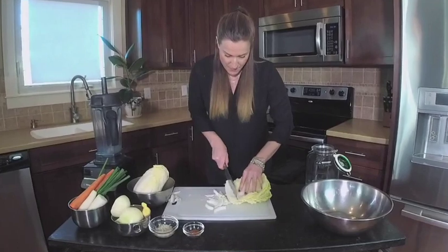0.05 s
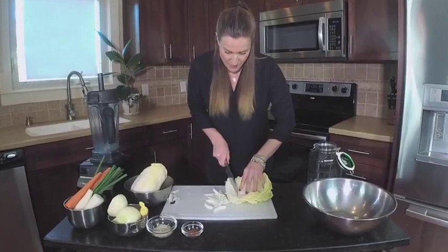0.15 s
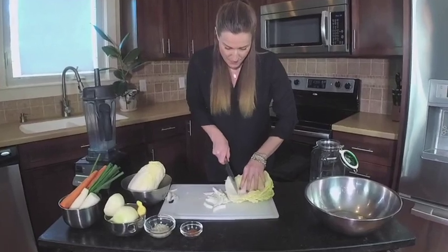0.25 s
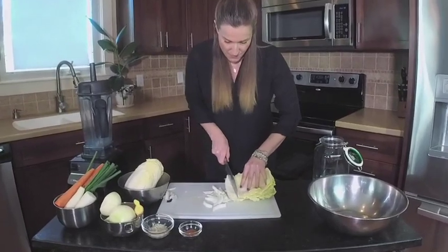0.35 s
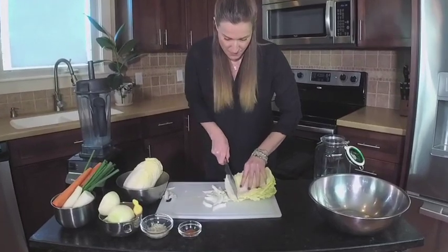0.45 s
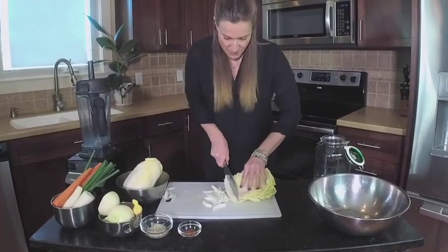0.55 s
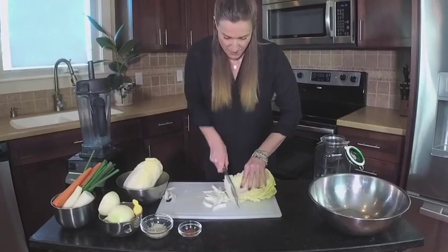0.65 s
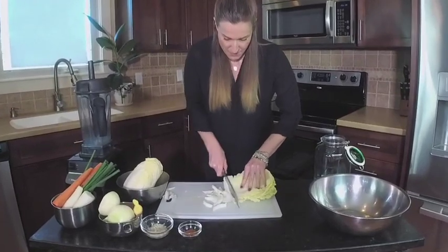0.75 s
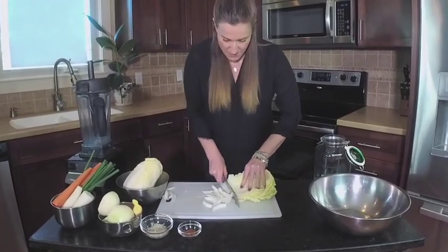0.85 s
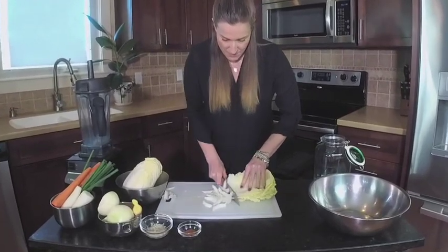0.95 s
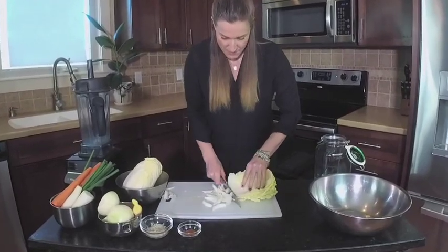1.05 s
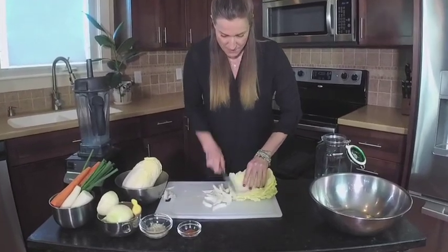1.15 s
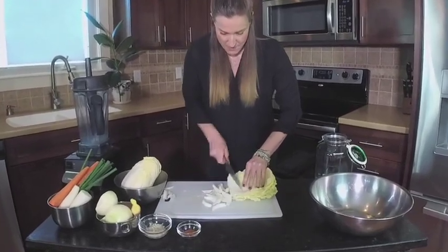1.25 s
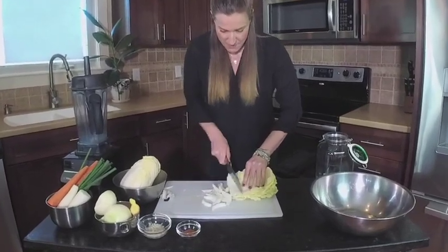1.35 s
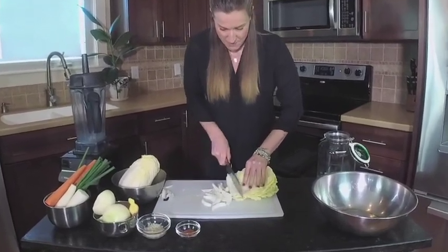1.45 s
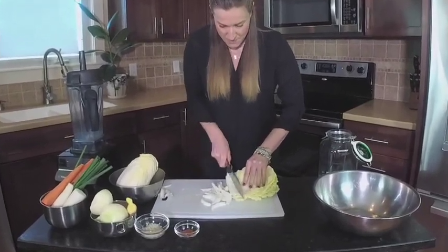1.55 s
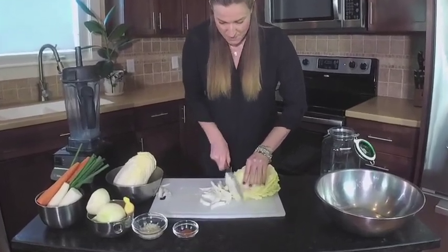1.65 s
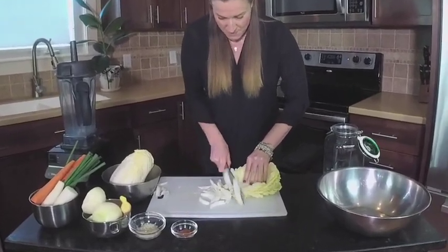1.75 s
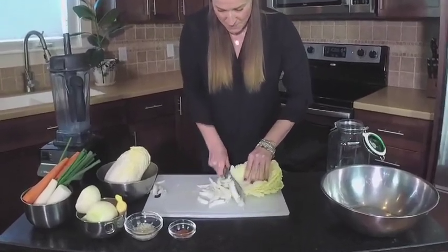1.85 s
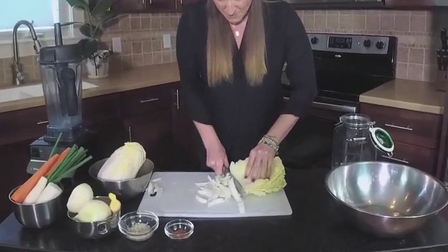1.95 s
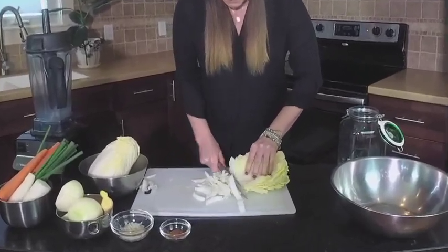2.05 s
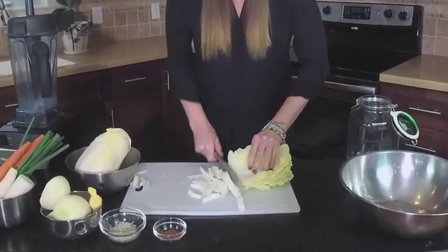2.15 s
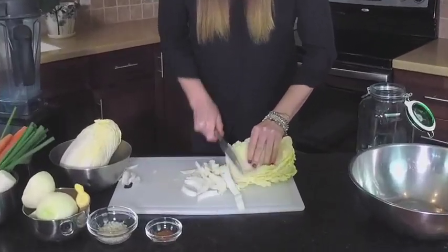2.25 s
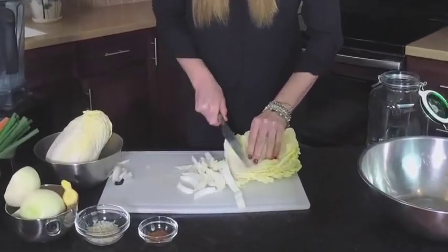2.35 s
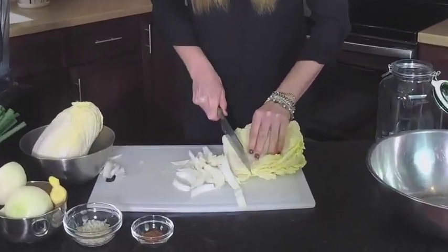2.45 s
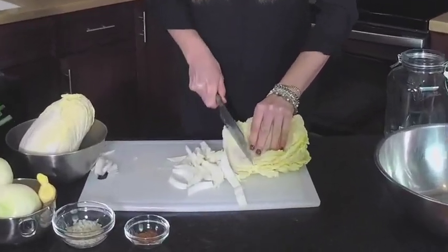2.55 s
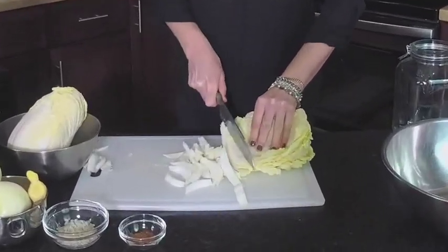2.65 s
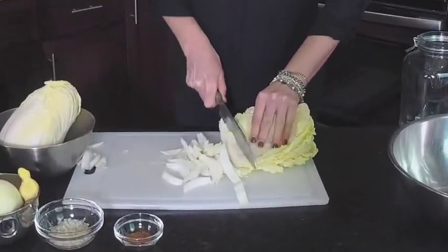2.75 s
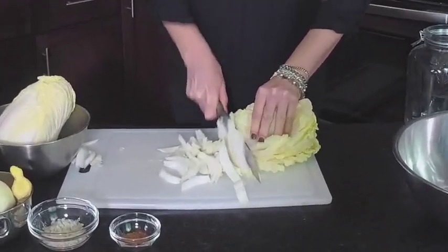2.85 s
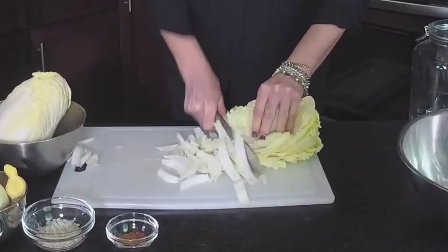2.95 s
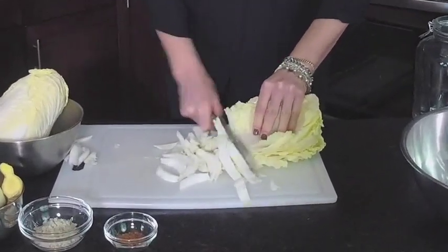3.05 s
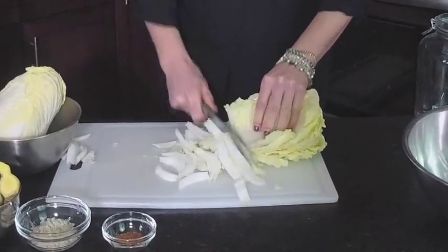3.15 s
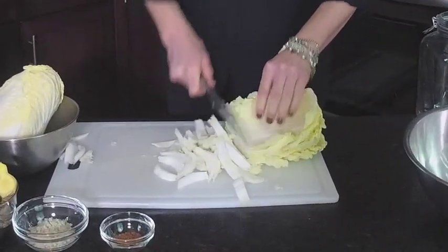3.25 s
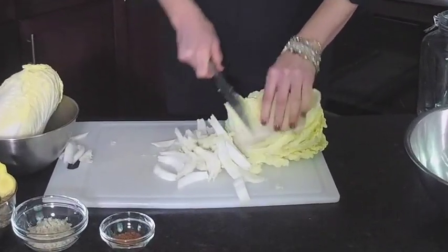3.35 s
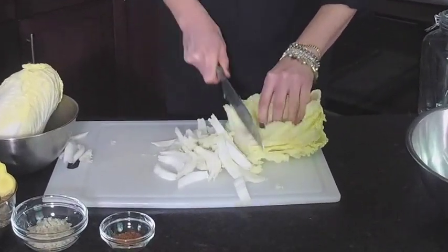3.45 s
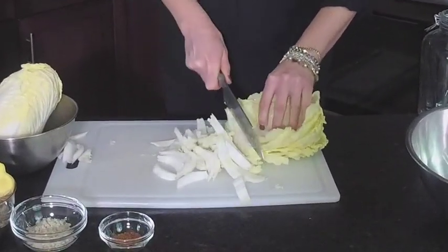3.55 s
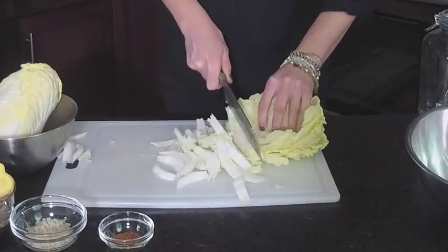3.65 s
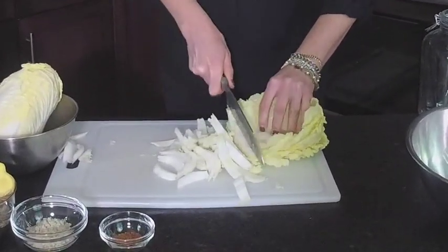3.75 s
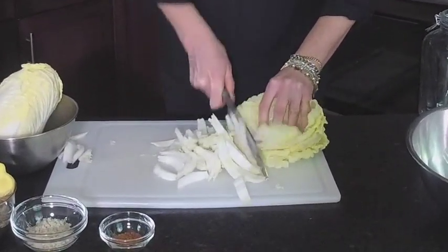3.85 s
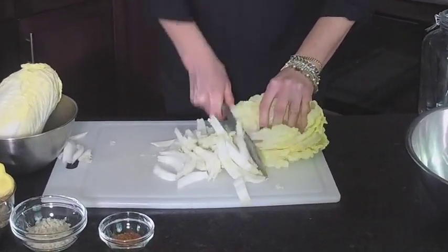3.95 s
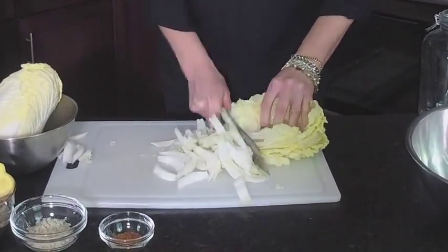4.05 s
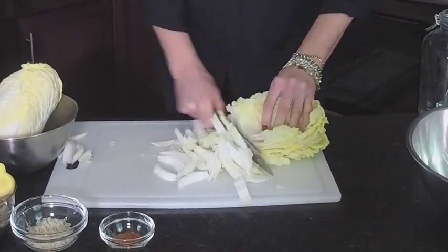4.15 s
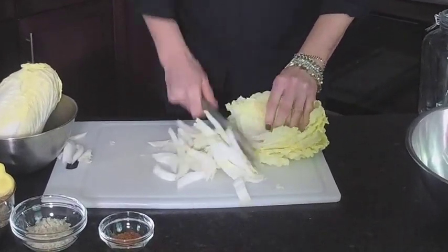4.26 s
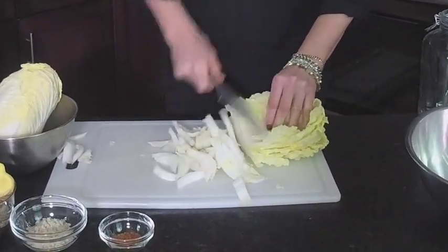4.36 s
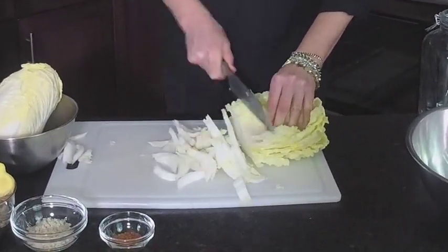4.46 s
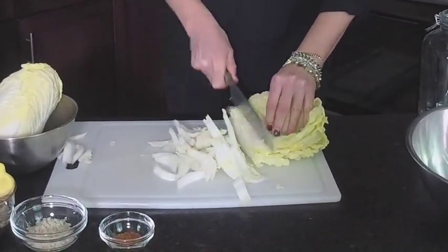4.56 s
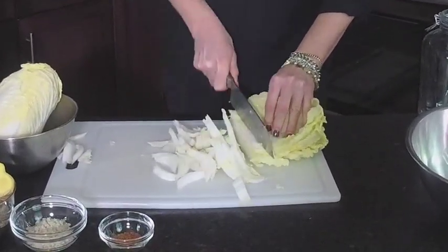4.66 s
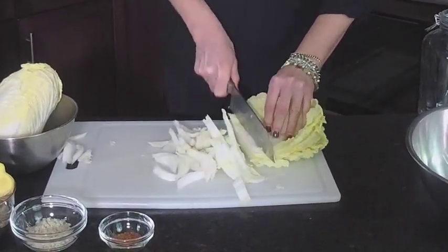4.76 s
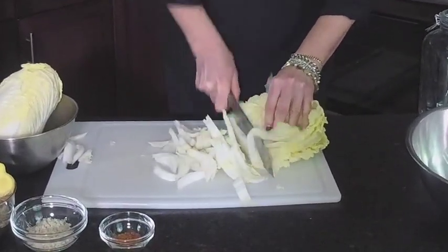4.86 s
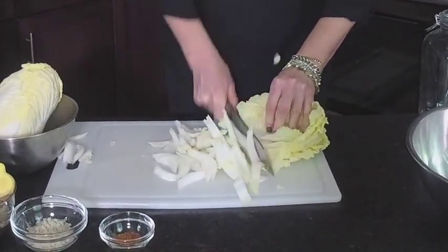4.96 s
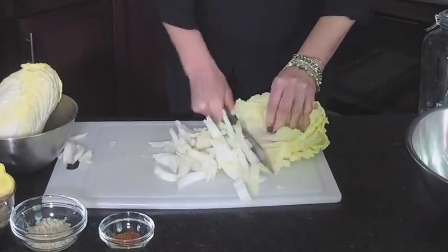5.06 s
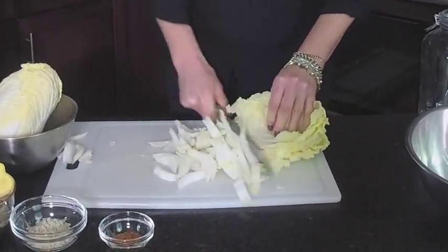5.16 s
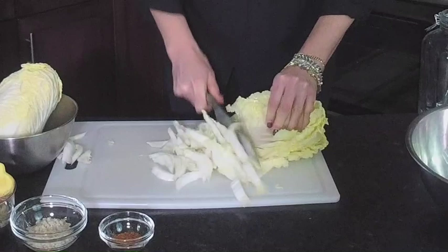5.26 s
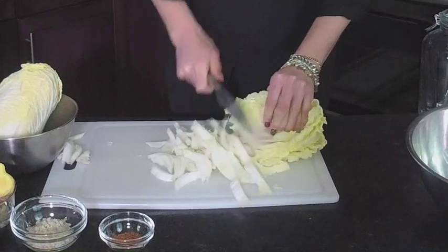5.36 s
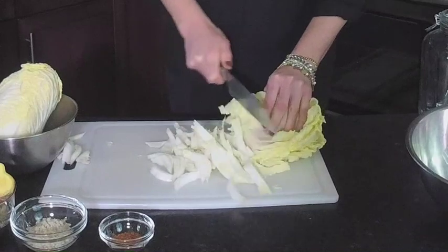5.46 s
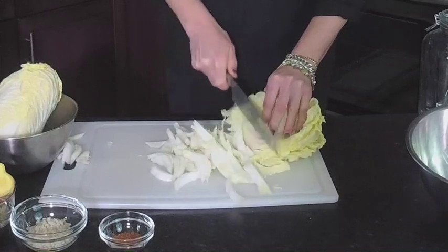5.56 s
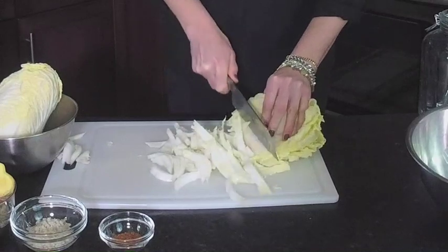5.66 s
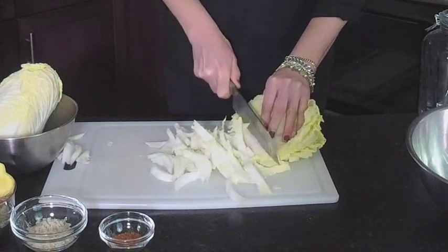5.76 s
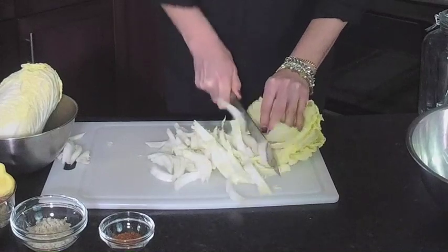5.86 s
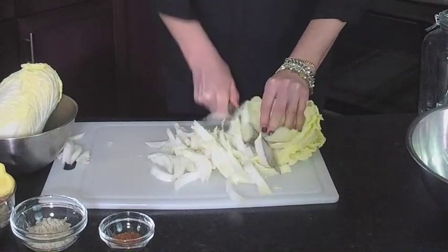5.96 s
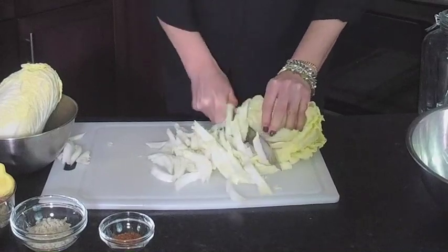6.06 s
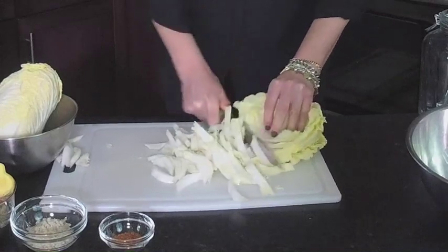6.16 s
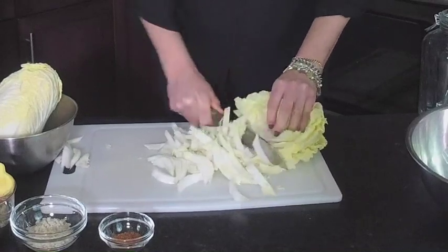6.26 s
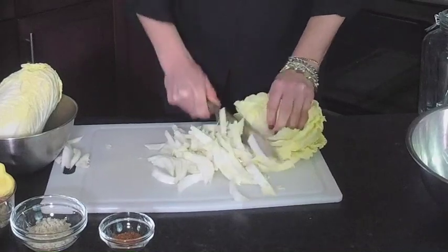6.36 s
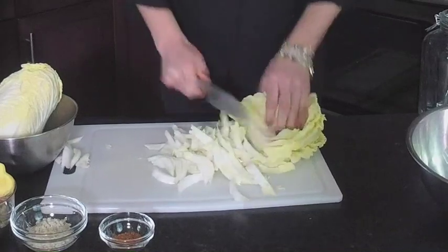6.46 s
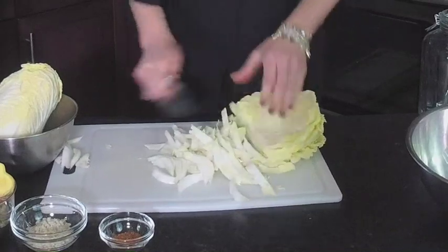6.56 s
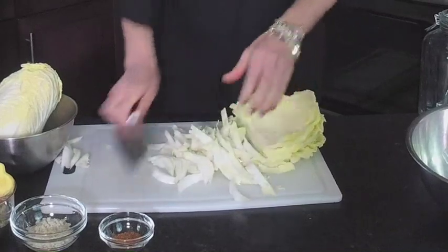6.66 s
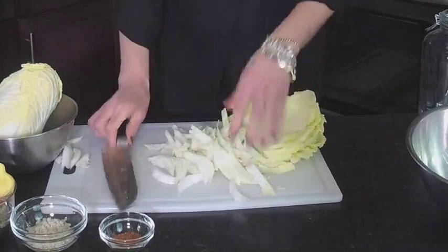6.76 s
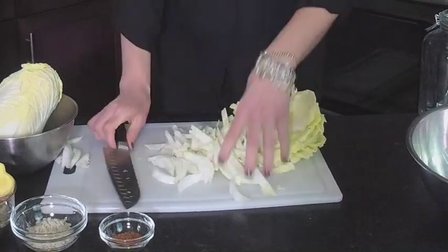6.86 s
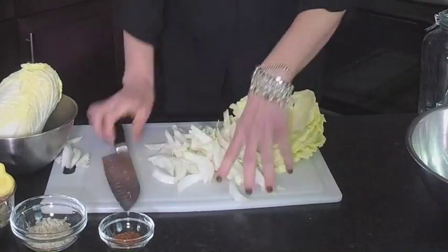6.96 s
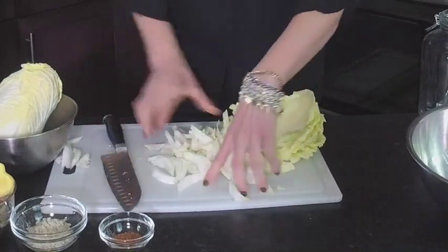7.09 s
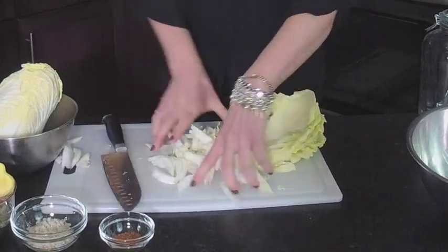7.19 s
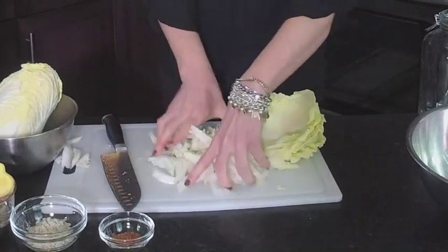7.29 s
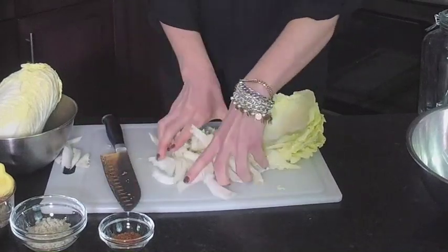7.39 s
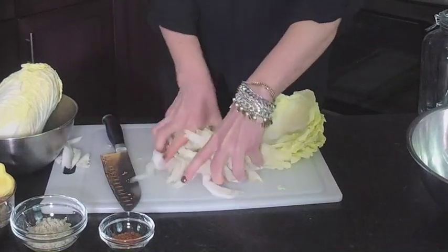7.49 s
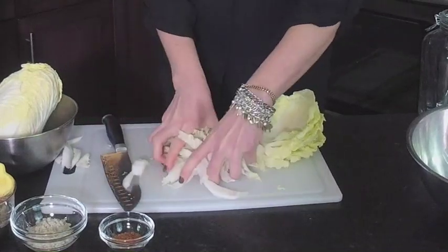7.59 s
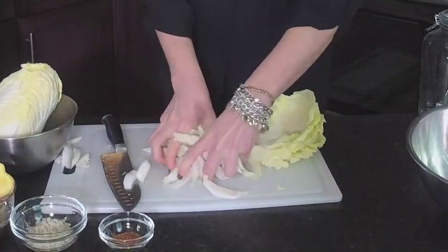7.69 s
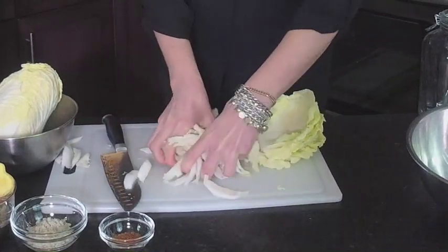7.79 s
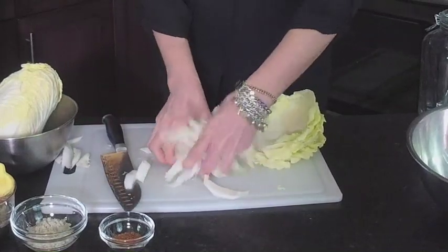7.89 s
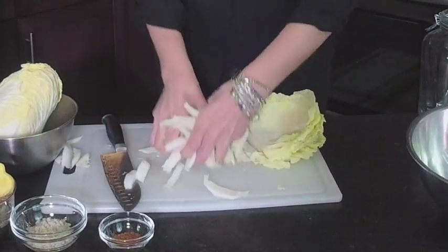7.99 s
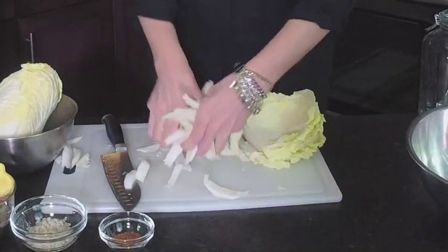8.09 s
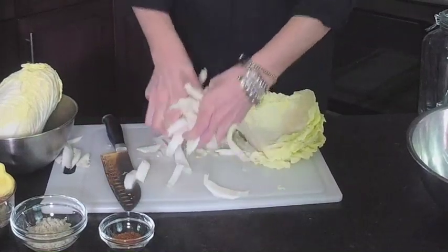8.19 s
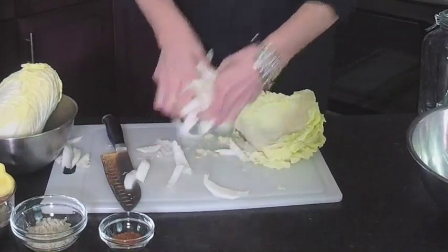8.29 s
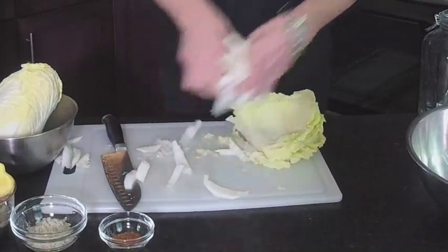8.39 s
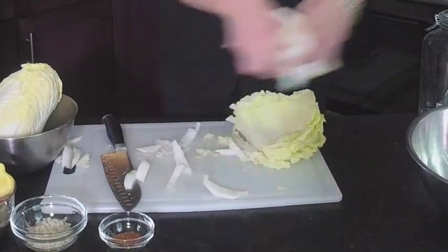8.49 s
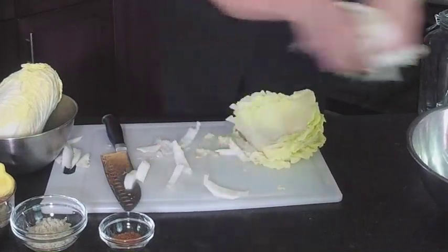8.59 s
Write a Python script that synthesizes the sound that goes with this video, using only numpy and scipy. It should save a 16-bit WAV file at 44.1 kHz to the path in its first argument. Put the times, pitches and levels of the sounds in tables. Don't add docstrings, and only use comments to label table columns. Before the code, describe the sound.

Faint leaf rustles lead into six separated chops through crisp cabbage: fine bright crackle, sharp rib snaps, then the blade smacking a plastic board that drums on the counter. The fourth blow is hardest. After a light touch, the steel knife clatters to rest, followed by quiet palm sweeps and tiny leafy ticks. A small, slightly thin-sounding camera microphone hears it across a lively kitchen with low appliance hum.

```python
import sys
import numpy as np
from scipy import signal
from scipy.fft import rfft, irfft, next_fast_len
from scipy.io import wavfile
from scipy.ndimage import uniform_filter1d, map_coordinates

SR = 44100
rng = np.random.default_rng(int(sys.argv[2]) if len(sys.argv) > 2 else 0)


def field_ratio(decibels):
    return 10 ** (np.asarray(decibels, dtype=float) / 20)


def pcm_store(signal):
    levels = np.round(np.clip(np.atleast_2d(signal), -1, 1) * 32767)
    wavfile.write(sys.argv[1], SR, levels.astype(np.int16).T)


N = 380583

# (start [s], end [s], crackle at start [dB], crackle at end [dB], board below it [dB])
BITES = [
    (0.552, 0.727, -55, -26.5, -13),
    (1.71, 1.74, -40.5, -35, -15),
    (2.702, 2.87, -45.5, -39, -13),
    (3.751, 3.842, -43.5, -37.5, -14.5),
    (3.85, 3.929, -35, -32.5, -1),
    (4.779, 4.836, -37, -33, -18),
    (4.841, 4.896, -37, -30.5, -5.5),
    (5.902, 5.927, -23.5, -19, -7),
    (6.26, 6.328, -42.5, -44, 13.5),
]
# (time [s], length [s], crackle [dB])
GIVES_WAY = [
    (0.732, 0.0076, -18.5),
    (1.751, 0.019, -15.5),
    (2.877, .035, -20),
    (3.945, 0.0065, -9),
    (4.892, .035, -17),
    (5.932, .008, -14),
    (7.045, 0.012, -22.5),
]
# (time [s], peak [dB], dullness [dB])
SNAPS = [(0.6508, -16.5, -27), (0.7027, -8, -41.5), (0.7229, -10, -22), (0.8411, -5, -7),
         (0.8653, -12.5, -12.5), (0.9049, -11, -21.5), (0.967, -14, -21), (1.5522, -20, -17),
         (1.7543, -5, -24), (2.7588, -22, -16), (2.806, -20, -20.5), (2.8836, -8, -27),
         (2.9995, -9.5, -14.5), (3.248, -27, -16), (3.7497, -21, -12.5), (3.862, -14, -17.5),
         (3.8835, -16, -8), (3.9279, -3, -25), (3.947, -5.5, -20.5), (3.9842, -10.5, -15),
         (4.04, -2.5, -19), (4.8386, -12.5, -16.5), (4.8681, -11.5, -14), (4.8973, -6, -15.5),
         (5.0513, -8.5, -18), (5.0966, -8, -13.5), (5.898, -10.5, -13.5), (6.016, -6, -22),
         (7.0498, -4.5, -14.5), (0.6944, -17.5, -25), (2.8533, -18.5, -17), (2.9759, -15, -20),
         (3.909, -15.5, -18.5), (5.0113, -18.5, -20.5), (5.925, -9, -11), (6.3224, -25, -13.5),
         (7.1284, -3.5, -17), (1.762, -10, -21), (1.767, -10.5, -24.5), (1.938, -13, -25)]
# (time [s], peak [dB])
CREASES = [(0.0505, -27), (0.5451, -28), (.565, -30.5), (1.62, -24.5), (1.643, -25), (0.8003, -12.5),
           (1.3943, -32.5), (1.4774, -20.5), (1.6025, -24.5), (1.6631, -28.5), (1.703, -17.5),
           (1.8873, -13.5), (2.5042, -33), (2.5431, -32.5), (2.6968, -25), (2.834, -20), (2.8709, -12.5),
           (3.7779, -19), (3.8441, -13), (4.2836, -29), (4.6168, -31.5), (4.7699, -16.5), (4.806, -13.5),
           (5.7716, -24.5), (5.7902, -18), (6.27, -26), (6.8886, -17), (1.711, -19.5), (1.725, -22),
           (1.738, -19.5), (.0982, -27), (1.4551, -32), (2.8115, -22), (3.5019, -39), (3.8122, -24.5),
           (4.6279, -28.5), (5.7458, -30), (6.2063, -31), (7.9872, -28), (7.775, -30), (7.843, -25),
           (7.5014, -29.5), (7.7967, -21.5), (7.8211, -27.5), (7.9739, -24.5)]
CREASE_DULL_DB = -37.5
# (time [s], peak [dB], pitch [Hz])
TICKS = [(0.3874, -45, 8010), (2.7605, -32.5, 3902), (3.4835, -46, 3923), (3.5856, -33.5, 8940),
         (3.615, -34, 8970), (3.7061, -33, 8620), (4.2854, -37, 8750), (5.4422, -44, 6290),
         (7.4675, -42, 5800), (7.6528, -27.5, 9230), (7.6621, -34, 8904), (8.0617, -36.5, 8920),
         (8.2064, -52, 6020), (8.326, -50.5, 6420), (6.872, -46, 3510), (7.0258, -36.5, 3448),
         (2.58, -51, 4110), (2.07, -43, 8970), (7.407, -47, 8500), (7.504, -45.5, 3524)]
# (time [s], length [s], level [dB])
RUBS = [
    (3.216, 0.039, -57),
    (3.787, 0.12, -56.5),
    (4.276, 0.019, -55),
    (.565, .01, -57.5),
    (5.435, 0.022, -73),
    (6.261, 0.047, -54.5),
    (6.894, .02, -42.5),
    (7.044, 0.056, -38),
]
# (start [s], end [s], crackle [dB], pressure [dB])
DRAGS = [
    (0.862, 0.964, -25, -26.5),
    (1.904, 1.981, -27.5, -26),
    (2.968, 3.053, -25.5, -25),
    (3.993, 4.074, -23.5, -25.5),
    (5.05, 5.072, -26.5, -25),
    (6.027, 6.075, -23, -26.5),
    (7.134, 7.248, -40.5, -27.5),
]
# (time [s], length [s], crackle [dB], board below it [dB])
RUSTLES = [(0.047, 0.027, -40.5, -7.5), (0.615, 0.017, -43, -11), (1.40, .06, -51.5, -18),
           (4.718, 0.018, -47, -17.5), (5.75, 0.0088, -48, -20), (5.827, .04, -45.5, -9.5),
           (1.475, 0.02, -41.5, -12.5), (1.553, 0.083, -36, -13.5), (2.463, 0.0075, -61.5, -14.5),
           (2.546, 0.025, -50.5, -12), (3.586, 0.011, -49.5, -7.5), (3.707, 0.0071, -52.5, -13),
           (3.221, 0.034, -55.5, -2), (2.227, .02, -60, 2.5), (6.499, 0.094, -67, 9.5),
           (3.489, 0.0058, -56, -5), (3.611, .02, -45, -20), (4.27, 0.02, -54, 14),
           (4.636, 0.015, -41, -26.5), (5.224, .01, -48, 1.5), (5.627, .05, -64, -9.5),
           (6.199, .02, -45.5, -5.5), (5.777, 0.025, -34.5, -16), (6.901, 0.016, -35.5, -12.5),
           (7.474, 0.018, -53, -4), (7.553, 0.026, -42, -14), (7.64, .05, -53, -5.5),
           (7.773, .02, -44, -9.5), (7.822, .01, -35.5, -16.5), (7.988, 0.024, -38, -13.5),
           (7.5, 0.017, -44.5, -11.5), (8.05, 0.0081, -54, -17.5)]
# (time [s], board pressure [dB], its fade [dB/s], counter weight [dB], lean [s])
LANDS = [(0.74, -23, 232, -23.5, 0.062), (.842, -27.5, 154, -35, .05), (.99, -26, 249, -38, 0.056),
         (1.773, -9.5, 327, -22, .1), (2.91, -16.5, 108.5, -18, 0.057), (3.948, -11, 106, -18, 0.24),
         (4.895, -24.5, 202, -30, 0.018), (4.924, -17, 147, -26, 0.13), (5.094, -29, 165, -26.5, .06),
         (5.936, -10.5, 123, -21, 0.22), (6.072, -17, 131, -24, 0.068), (6.33, -34.5, 231.5, -43.5, .03),
         (6.889, -34, 185.5, -63, .05), (7.05, -17, 198, -27, .08), (7.161, -28.5, 144, -32.5, 0.13),
         (7.949, -62, 63.5, -50, .3)]
# (time [s], peak [dB], low drum [dB], pitch of the struck spot [Hz])
KNOCKS = [(.051, -66, -4, 1466), (0.649, -38.5, -17, 1023), (.74, -15, -2, 562.4), (.841, -14, -24, 1513),
          (1.553, -42, -18, 1640), (1.604, -41, -20, 939), (1.771, -9.5, -4, 831),
          (2.758, -38.5, -23.5, 901), (2.837, -43, -27, 1637), (2.871, -37, -12, 1168),
          (2.909, -4, -10, 1332), (3.814, -45.5, -20, 1493), (3.845, -32.5, -46, 1167),
          (3.882, -37, -25.5, 959), (4.125, -49.5, 26, 499), (.772, -50, 26, 430), (2.95, -49.5, 27.5, 498),
          (6.31, -38.5, -20, 1100), (4.285, -45, -20, 1001), (3.943, 6, -21, 922),
          (4.837, -33.5, -33.5, 1435), (4.872, -30, -10.5, 1221), (4.901, -16, -26.5, 1473),
          (4.928, -15.5, -5, 821), (5.094, -18, -15, 978.5), (5.135, -40, 10, 558), (3.828, -39, -24, 1580),
          (1.737, -35.5, -25.5, 1502), (3.932, -25, -14, 1047), (7.651, -42.5, -22, 1100),
          (5.825, -38.5, -26, 817), (5.904, -26.5, -2, 945), (5.938, -3.5, -11.5, 1459),
          (6.072, -6, -16, 1211), (6.887, -33.5, -18, 1697), (7.046, -23.5, -11, 1512),
          (7.586, -32, -21.5, 1050), (7.774, -36.5, -40, 1080), (7.854, -45, -9, 1080),
          (7.966, -52, -16, 1059)]
# (time [s], peak [dB])
THUDS = [(0.739, -35), (0.989, -37.5), (1.776, -41), (1.986, -44), (3.944, -37), (4.898, -39),
         (5.929, -44.5), (6.101, -38.5), (3.073, -41.5), (4.096, -36.5), (5.092, -31), (7.048, -44)]
# (time [s], pitch [Hz], peak [dB], t60 [s])
RUNG = [(.74, 543, -21.5, .12), (.74, 431, -24, .15), (.742, 706, -27, 0.17), (.742, 826, -28, .2),
        (.745, 1250, -29, 0.13), (.841, 752, -20, .05), (1.771, 705, -23, 0.14), (1.771, 813, -21.5, .2),
        (1.771, 1370, -19, .2), (1.771, 1590, -20.5, 0.13), (2.91, 1341, -22, .2), (2.91, 1508, -20, 0.11),
        (2.912, 770.3, -22.5, 0.17), (2.912, 537, -21, .2), (3.943, 623, -20.5, .3), (3.943, 901, -16, .08),
        (3.943, 1377, -20, 0.34), (3.943, 1463, -18, .3), (3.943, 1634, -19, .1), (3.861, 1500, -27.5, .03),
        (3.883, 975, -36, .2), (3.9, 1256, -35.5, .15), (4.929, 822, -25.5, 0.18), (4.929, 1403, -26, .3),
        (4.929, 1551, -24.5, 0.12), (4.93, 409.3, -26.5, 0.089), (5.093, 1144, -27, 0.13),
        (5.093, 554, -30, 0.18), (5.937, 1276, -23, 0.29), (5.937, 1380, -17, 0.32), (5.937, 1460, -16, .3),
        (5.937, 1645, -19, .15), (5.94, 723.6, -22, .15), (5.937, 430.5, -24.5, .1),
        (6.071, 1140, -24, 0.13), (6.075, 1402, -25.5, 0.15), (6.272, 2121, -36, .08),
        (6.29, 1008, -38.5, 0.37), (6.29, 1410, -38, 0.19), (6.889, 773, -39.5, .2),
        (6.887, 1436, -40.5, 0.18), (7.045, 1513, -23, .15), (7.045, 1233, -27.5, .3),
        (7.052, 817.5, -26, 0.21), (7.052, 980, -24.5, 0.17), (7.052, 1705, -27.5, .25)]
# (time [s], peak [dB])
CRACKS = [(0.78, -2.5), (3.861, -24), (3.883, -24), (6.272, -34), (5.6, -33), (6.33, -33), (2.91, -11),
          (3.943, -1), (4.899, -16), (5.094, -16), (5.937, -10.5), (4.87, -21.5), (4.4, -31),
          (2.8704, -18.5)]
# (time [s], length [s], level [dB])
SWEEPS = [
    (7.573, 0.039, -53),
    (7.77, 0.027, -57.5),
    (7.855, .03, -54.5),
]
# (time [s], peak [dB])
LAID = [(6.878, -20), (6.888, -18), (6.897, -20.5), (7.046, -3), (7.051, 0), (7.112, -13), (7.127, -1),
        (7.177, -11), (7.188, -6), (7.21, -10.5), (7.248, -16.5), (7.327, -30)]
# (pitch [Hz], level [dB], t60 [s])
STEEL = [(3390, -13, 0.074), (4200, -8, .06), (5270, -6.5, 0.27), (5690, -8.5, .12), (6200, -6, 0.13),
         (7760, -2, 0.11), (8540, 0, 0.12), (8660, -4.5, .18), (9310, -7, 0.15), (9950, -4.5, 0.12),
         (9900, -7.5, 0.062)]
# (centre [Hz], width [Hz], level [dB])
BOARD = [(537, 150, -2.5), (874, 110, -3.5), (1080, 140, -6), (1270, 92, -0.5), (1402, 270, -4),
         (1708, 180, -4), (2204, 200, -6)]
# (centre [Hz], width [Hz], level [dB])
DRUM = [(170, 120, -12), (309, 20, -2), (420, 100, -11)]
# (centre [Hz], width [Hz], level [dB])
EDGE = [(1100, 1500, 2.5), (3400, 1600, -4.5)]
# (centre [Hz], width [Hz], level [dB])
HOLLOW = [(1080, 67, 0)]
# (frequency [Hz], gain [dB])
CRACKLE = [(2500, -44.5), (4800, -17), (6300, -11.5), (7500, -5), (8800, 2.5), (9300, 3.5), (9550, -5),
           (10500, -11.5), (11300, -20), (12000, -41)]
# (frequency [Hz], gain [dB])
SQUEAK = [(900, -38.5), (1800, -6), (2600, -1), (3300, -8), (4200, -4), (5000, -0.5), (6500, -23.5)]
# crackle, pressure, weight (level [dB])
REST_DB = (-76.5, -74, -67)
# (frequency [Hz], t60 [s])
KITCHEN = [(150, .5), (500, .45), (2000, .36), (6000, .25), (10000, .2)]
# (frequency [Hz], gain [dB])
AIR = [(25, -11), (65, -14.5), (110, 16), (200, 14), (500, -2.5), (1200, -15), (1900, -38.5), (3500, -36),
       (6000, -33.5), (8800, -27.5), (9400, -20.5), (10500, -29), (11500, -51.5)]
# (frequency [Hz], rms level [dB])
HUM = [(118.4, -65), (220.7, -68.5), (328.4, -94.5)]
# (frequency [Hz], correlation [1])
ALIKE = [(60, .97), (130, .98), (300, .995), (660, .97), (1460, .91), (3230, .78), (7170, .58),
         (10700, .35)]
# (frequency [Hz], level [dB])
LEAN = [(100, .4), (6800, .1), (8000, 4.5), (9000, 6.5), (11000, 7)]
# (frequency [Hz], share [1])
CASE = [(100, .97), (5000, .97), (7300, .92), (7900, .5), (8600, .05)]
CASE_HZ = 2404

BITE_IN, GIVE_IN, GIVE_OUT, LAND_IN = 970, 2700, 580, 1100
DRAG_IN, DRAG_OUT, DRAG_BOARD_OUT = 160, 280, 360
RUSTLE_IN, RUSTLE_OUT, SAG, LIFT = 1500, 290, 72, 670
SETTLE_DB, SETTLE_OUT = -39.5, 52
LEAN_LAG_S = 0.009
SQUEAK_OF_CRACKLE, SQUEAK_DB = .62, -11
LARGEST_GRAIN = 2.8
CONTACT_T60 = 0.027
RUNG_ROUGH, RUNG_DB = .045, -2
STEEL_DB, CLINK_DB, STEEL_ROUGH = -30, -4, .05
RATTLE_DB, RATTLE_T60 = -17.5, 0.099
CLICK_DB = 4


def unit(x):
    return x / np.sqrt(np.mean(x ** 2) + 1e-20)


def along(points, hz):
    f, v = np.transpose(points)
    return np.interp(np.log(hz + 1), np.log(f + 1), v)


def filtered(x, response):
    m = next_fast_len(N + SR // 2)
    return irfft(rfft(x, m) * response(np.fft.rfftfreq(m, 1 / SR)), m)[..., :N]


def colour(points):
    return lambda hz: field_ratio(along(points, hz))


def modes(table):
    def response(f):
        total = 0
        for k, (centre, width, db) in enumerate(table):
            damping = 1j * f * width
            total = total + (-1) ** k * field_ratio(db) * damping / (centre * centre - f * f + damping)
        return total
    return response


def wobble(rate):
    knots = rng.standard_normal(int(N * rate / SR) + 4)
    return map_coordinates(knots, [np.arange(N) * rate / SR])


def swell(start, end, from_db, to_db, rise, fall):
    t = np.arange(0, N, 32) / SR
    held_db = np.interp(t, [start, max(end, start + 1e-4)], [from_db, to_db])
    before, after = np.maximum(start - t, 0), np.maximum(t - end, 0)
    return field_ratio(2 * (held_db - rise * before - fall * after))


def level(power):
    return np.sqrt(np.interp(np.arange(N), np.arange(0, N, 32), power))


def grains(rate, spread_db, clump_db):
    hit = rng.random(N) < rate / SR
    loudness = field_ratio(spread_db * np.minimum(rng.exponential(size=N), 2))
    size = loudness * np.clip(rng.standard_normal(N), -1.7, 1.7)
    size = unit(size * field_ratio(clump_db * wobble(40)))
    z = signal.stft(hit * np.clip(size, -LARGEST_GRAIN, LARGEST_GRAIN), nperseg=256)[2]
    patches = uniform_filter1d(rng.standard_normal(z.shape), size=6, axis=0)
    patches = uniform_filter1d(patches, size=8, axis=1)
    gain = field_ratio(2.92 * np.minimum(unit(patches), 1.5))
    return signal.istft(z * gain, nperseg=256)[1][:N]


def bursts(times, levels_db, t60):
    x, t = np.zeros(N + SR), np.arange(SR // 8) / SR
    shape = field_ratio(-60 * t / t60) * (1 - np.exp(-t / .0006))
    for s, db in zip(times, levels_db):
        puff = shape * rng.standard_normal(len(t))
        x[round(s * SR):][:len(t)] += field_ratio(db) * puff * np.linalg.norm(shape) / np.linalg.norm(puff)
    return x[:N]


def rings(times, levels_db, pitches_hz, t60, rough):
    x, t = np.zeros(N + SR), np.arange(SR // 6) / SR
    for s, db, hz in zip(times, levels_db, pitches_hz):
        waver = np.cumsum(rng.standard_normal(len(t))) * rough
        x[round(s * SR):][:len(t)] += field_ratio(db - 60 * t / t60) * np.sin(2 * np.pi * hz * t + waver)
    return x[:N]


def stroke():
    crackle, pressure, weight = field_ratio(2 * np.array(REST_DB))
    for s, end, a_db, b_db, board_db in BITES:
        bite = swell(s, end, a_db, b_db, BITE_IN, GIVE_OUT)
        crackle = crackle + bite
        pressure = pressure + bite * field_ratio(2 * board_db)
    for s, length, db in GIVES_WAY:
        crackle = crackle + swell(s, s + length, db, db, GIVE_IN, GIVE_OUT)
    for s, db, fade, weight_db, lean in LANDS:
        pressure = pressure + swell(s, s, db, db, LAND_IN, fade)
        taken = s + LEAN_LAG_S
        weight = weight + swell(taken, taken + lean, weight_db, weight_db - SAG * lean, LAND_IN, LIFT)
    for s, end, db, board_db in DRAGS:
        settle = swell(end, end, db + SETTLE_DB, db + SETTLE_DB, DRAG_IN, SETTLE_OUT)
        crackle = crackle + settle + swell(s, end, db, db, DRAG_IN, DRAG_OUT)
        pressure = pressure + settle + swell(s, end, board_db, board_db, DRAG_IN, DRAG_BOARD_OUT)
    for s, length, db, board_db in RUSTLES:
        rustle = swell(s, s + length, db, db, RUSTLE_IN, RUSTLE_OUT)
        crackle = crackle + rustle
        pressure = pressure + rustle * field_ratio(2 * board_db)
    crackle, pressure, weight = level(crackle), level(pressure), level(weight)
    rubs = level(sum(swell(s, s + length, db, db, BITE_IN, RUSTLE_OUT) for s, length, db in RUBS))
    cut_and_pressed = crackle ** SQUEAK_OF_CRACKLE * pressure ** (1 - SQUEAK_OF_CRACKLE)
    squeak = rubs + field_ratio(SQUEAK_DB) * cut_and_pressed
    return crackle, pressure, squeak, weight


def leaves(crackle, squeak):
    sparse = unit(grains(1800, spread_db=4, clump_db=3.5))
    dense = unit(grains(6000, spread_db=2.5, clump_db=2))
    merged = np.clip(crackle / field_ratio(-24), .3, .9)
    cells = np.sqrt(1 - merged) * sparse + np.sqrt(merged) * dense
    fine = crackle * unit(filtered(cells, colour(CRACKLE)))
    ribs = squeak * unit(filtered(grains(2600, spread_db=3, clump_db=2.5), colour(SQUEAK)))
    s, db, dull_db = np.transpose(SNAPS + [(s, db, CREASE_DULL_DB) for s, db in CREASES])
    bright = filtered(bursts(s, db + 8, t60=.009), colour(CRACKLE))
    dull = filtered(bursts(s, db + dull_db + 10.0, t60=0.016), colour(SQUEAK))
    ticks = rings(*np.transpose(TICKS), t60=.018, rough=.17)
    return field_ratio(-2) * fine + field_ratio(-4) * ribs + bright + dull + field_ratio(-3) * ticks


def board(pressure, weight):
    grind = pressure * unit(filtered(grains(2500, spread_db=2.5, clump_db=1.3), modes(BOARD)))
    rumble = weight * unit(filtered(grains(600, spread_db=3.5, clump_db=2.0), modes(DRUM)))
    s, db, drum_db, hz = np.transpose(KNOCKS)
    knocks = filtered(bursts(s, 1.2 * db + 4, CONTACT_T60), modes(BOARD))
    spot = rings(s, np.minimum(db - 4, .5 * db - 15), hz, t60=.06, rough=.11)
    drum = rings(s + .004, db + drum_db - 2, DRUM[1][0] + 0 * s, t60=.35, rough=.014)
    s, db = np.transpose(THUDS)
    thud = rings(s, db + 13, rng.uniform(90, 150, len(s)), t60=.16, rough=.04)
    return field_ratio(-10.0) * grind + field_ratio(-4) * rumble + knocks + spot + drum + thud


def sheet():
    return field_ratio(RUNG_DB) * sum(rings([s], [db], [hz], t60, RUNG_ROUGH) for s, hz, db, t60 in RUNG)


def contacts():
    sweep = level(sum(swell(s, s + length, db, db - 8, 900, 300) for s, length, db in SWEEPS))
    rub = sweep * unit(filtered(grains(500, spread_db=5.5, clump_db=5.5), modes(HOLLOW)))
    s, db = np.transpose(CRACKS)
    cracks = bursts(s, db + 5.5, t60=0.0037)
    first_instant = np.round((s + .001) * SR).astype(int)
    cracks[first_instant] += field_ratio(db + CLICK_DB)
    return rub + filtered(cracks, modes(EDGE))


def knife():
    s, db = np.transpose(LAID)
    ring = 0
    for hz, mode_db, t60 in STEEL:
        uneven_db = rng.normal(0, 2.7, len(s))
        ring = ring + rings(s, db + mode_db + STEEL_DB + uneven_db, hz + 0 * s, t60, STEEL_ROUGH)
    touch = bursts(s, db + CLINK_DB, t60=0.005) + bursts(s, db + RATTLE_DB, RATTLE_T60)
    return ring + filtered(touch, modes([(6100, 1800, 1), (8400, 2300, -2)]))


def scattered(x):
    out, step, t = np.zeros(N + SR), SR // 20, np.arange(200) / SR
    for at in range(0, N, step):
        smear = rng.standard_normal(len(t)) * field_ratio(-60 * t / 0.0069)
        answer = signal.fftconvolve(x[at:at + step], smear / np.linalg.norm(smear))
        out[at:at + len(answer)] += answer
    return out[:N]


def kitchen(x):
    wet, step = np.zeros((2, N + 2 * SR)), SR // 4
    delay = 130
    for at in range(0, N, step):
        hz, t, z = signal.stft(rng.standard_normal((2, SR * 2 // 3)), SR, nperseg=256)
        decay = field_ratio(-60 * t / along(KITCHEN, hz)[:, None])
        tail = signal.istft(z * decay, SR, nperseg=256)[1]
        answer = signal.fftconvolve(x[None, at:at + step], tail / np.linalg.norm(tail[0]), axes=1)
        wet[:, at + delay:at + delay + answer.shape[1]] += answer
    return wet[:, :N]


def room_tone():
    t = np.arange(N) / SR
    air = unit(filtered(rng.standard_normal((2, N)), colour(AIR))) * field_ratio(-54.0 + 1.7 * wobble(5.2))
    hum = 0
    for hz, db in HUM:
        strength = field_ratio(db + 8.0 + 3.8 * wobble(31))
        hum = hum + strength * np.sin(2 * np.pi * hz * t + 2.4 * wobble(4.7))
    drift = field_ratio(np.interp(t, [0, 8.0, 8.63], [.3, .1, -4]))
    return (air + hum * [[1], [.5]]) * drift


def ports(common, apart):
    def mix(hz):
        turn = np.arccos(np.clip(along(ALIKE, hz), -1, 1)) / 2
        return [np.cos(turn), np.sin(turn)]
    mid, side = filtered(np.array([common, apart]), mix)
    pair = np.array([mid + side, mid - side])
    return filtered(pair, lambda hz: field_ratio(along(LEAN, hz) * [[.5], [-.5]]))


def scene():
    crackle, pressure, squeak, weight = stroke()
    near = leaves(crackle, squeak) + board(pressure, weight) + sheet() + knife() + contacts()
    wet = field_ratio(-7) * kitchen(near)
    return ports(*(np.array([near, scattered(near)]) + wet + room_tone()))


def band_limit(x):
    return signal.sosfilt(signal.butter(12, 11280, fs=SR, output="sos"), x)


def record(dry):
    def microphone(hz):
        echo = along(CASE, hz) * np.exp(-2j * np.pi * hz / CASE_HZ)
        bass_cut = (1j * hz / (70 + 1j * hz)) ** 2
        return (1 - echo) ** 1.25 * bass_cut
    mix = np.clip(filtered(dry, microphone), -1, 1)
    return band_limit(mix)


dry = scene()
out = record(dry)
pcm_store(out)
```